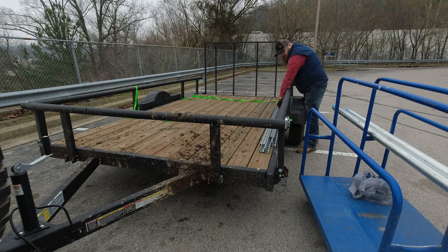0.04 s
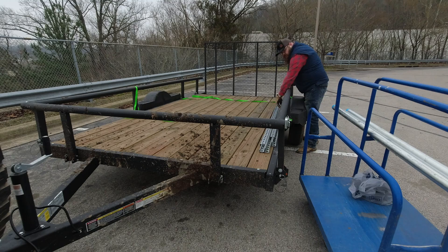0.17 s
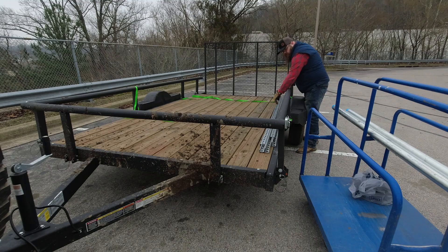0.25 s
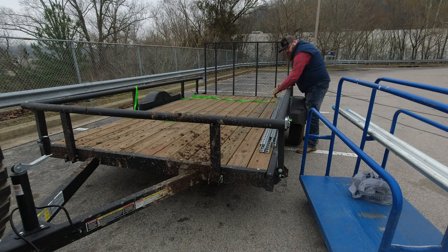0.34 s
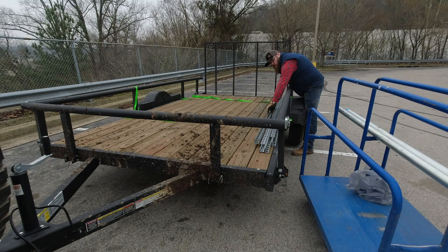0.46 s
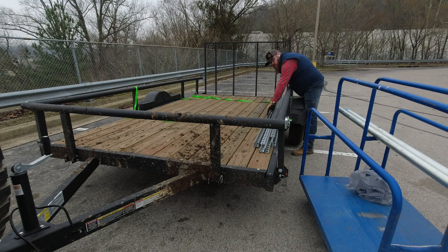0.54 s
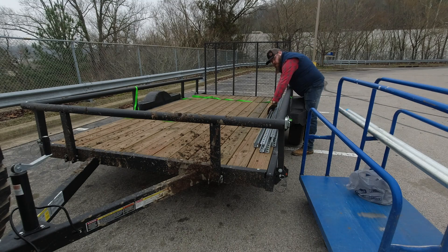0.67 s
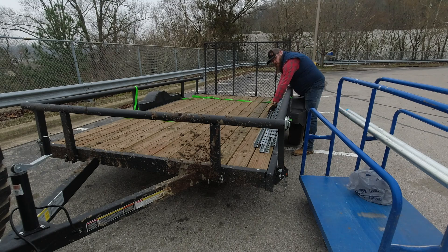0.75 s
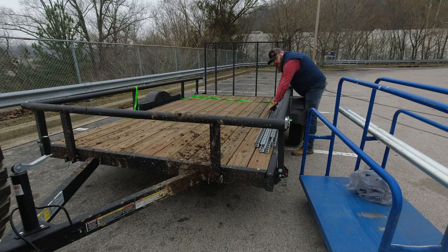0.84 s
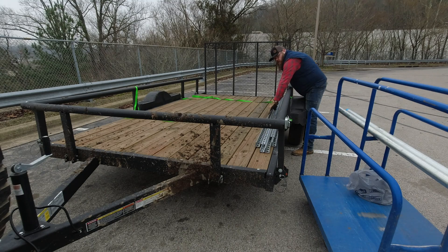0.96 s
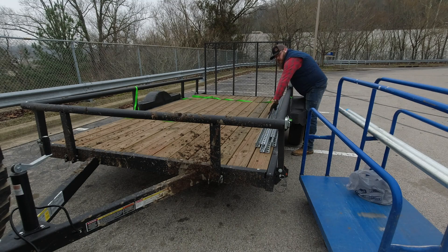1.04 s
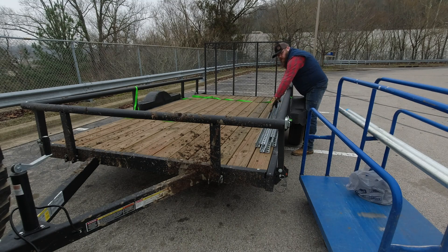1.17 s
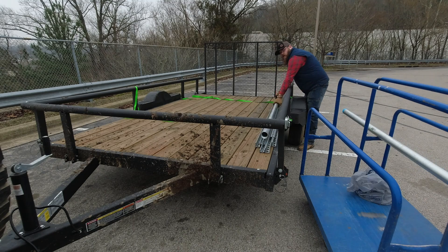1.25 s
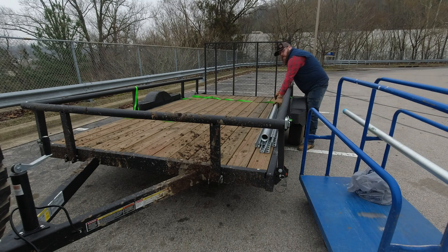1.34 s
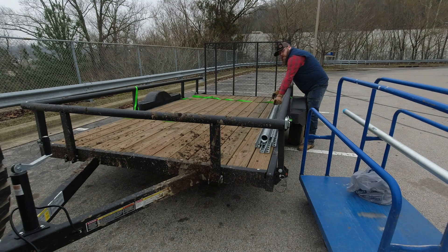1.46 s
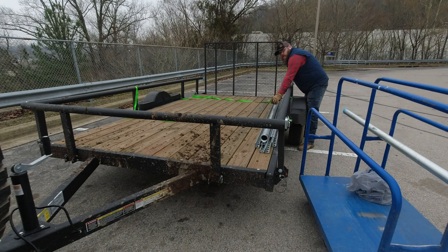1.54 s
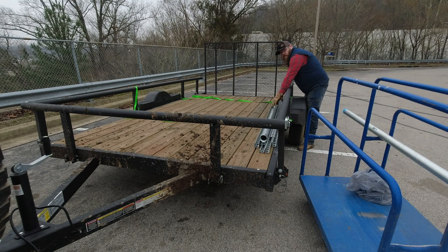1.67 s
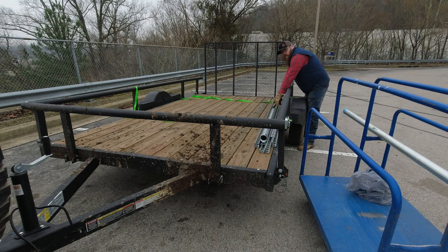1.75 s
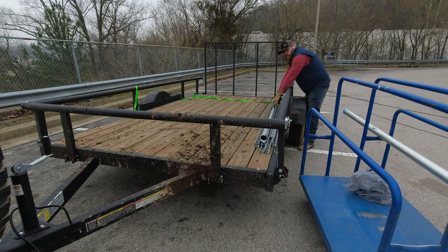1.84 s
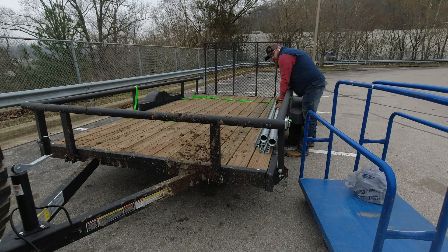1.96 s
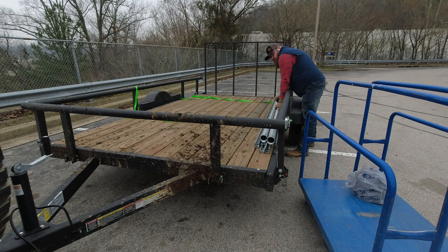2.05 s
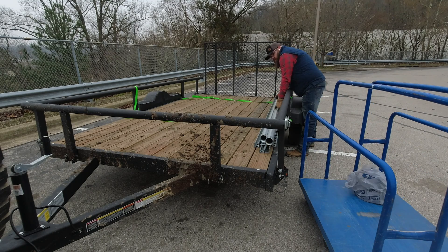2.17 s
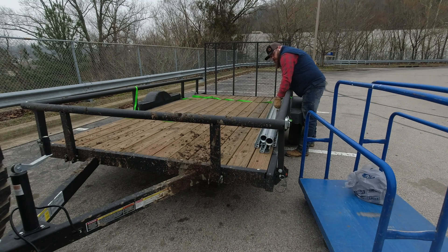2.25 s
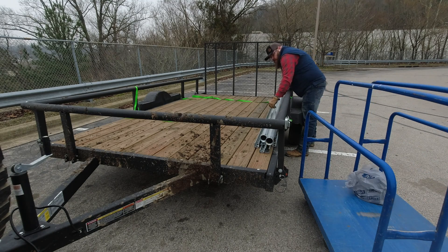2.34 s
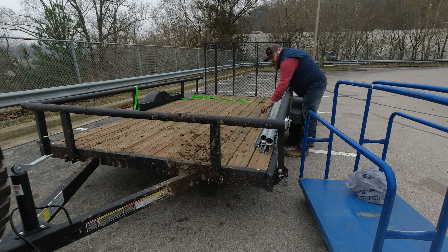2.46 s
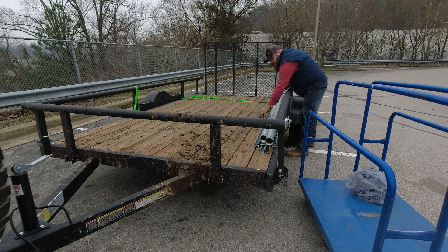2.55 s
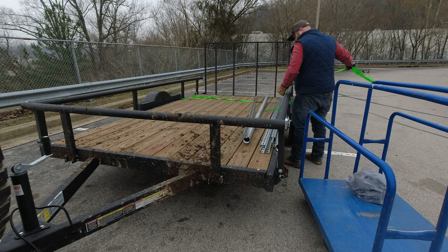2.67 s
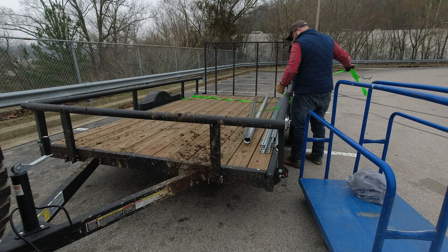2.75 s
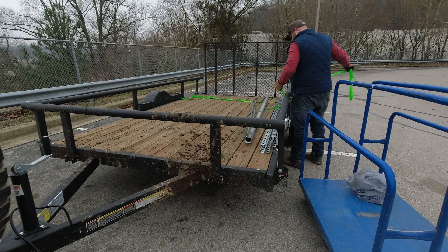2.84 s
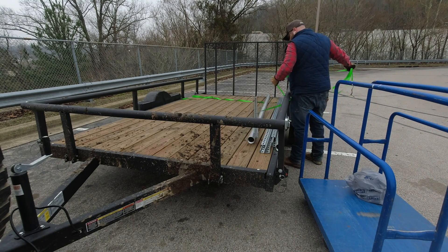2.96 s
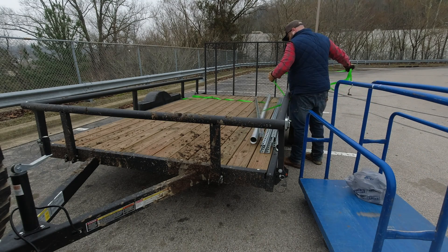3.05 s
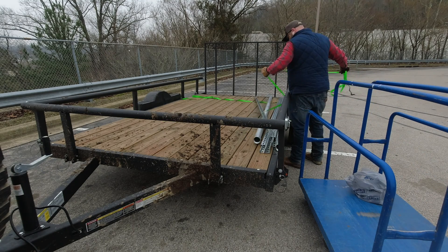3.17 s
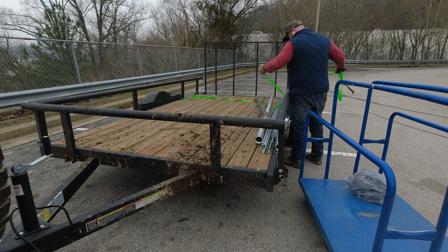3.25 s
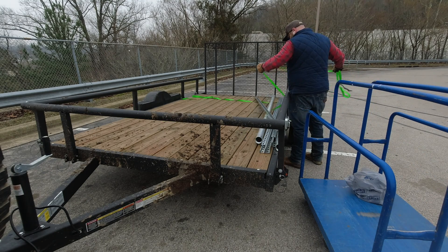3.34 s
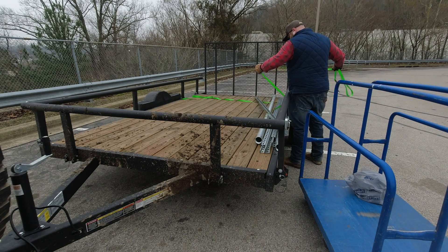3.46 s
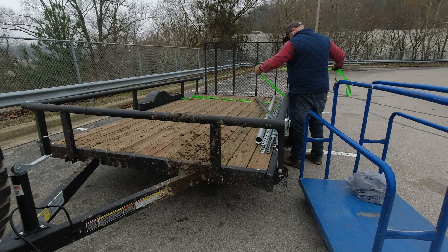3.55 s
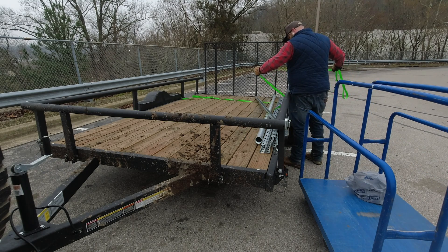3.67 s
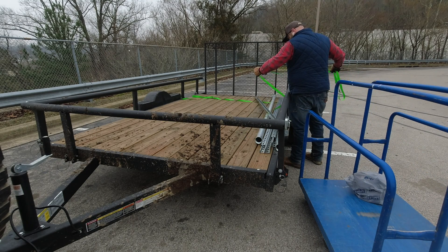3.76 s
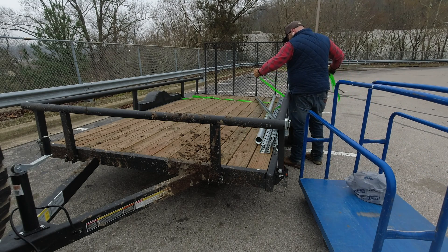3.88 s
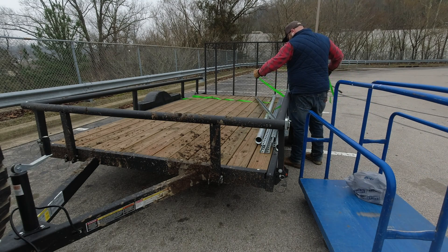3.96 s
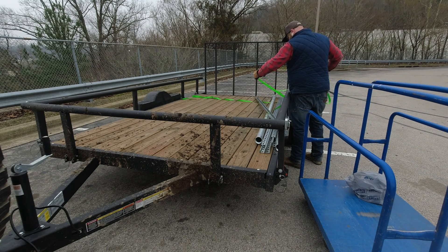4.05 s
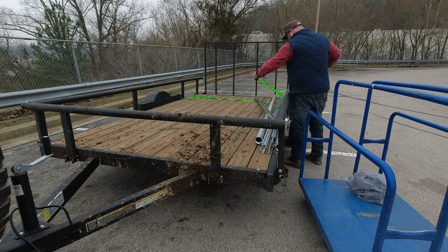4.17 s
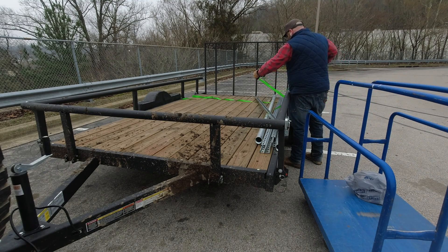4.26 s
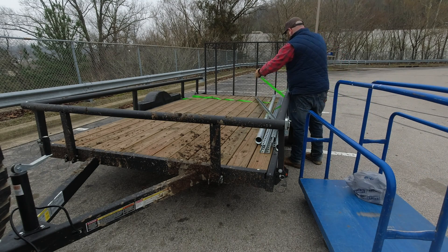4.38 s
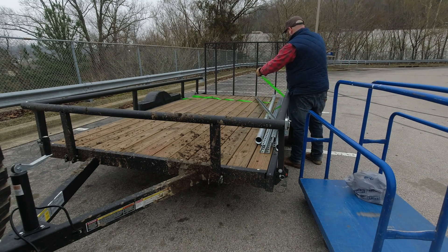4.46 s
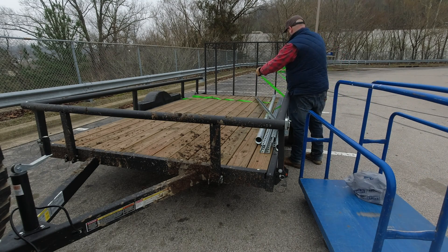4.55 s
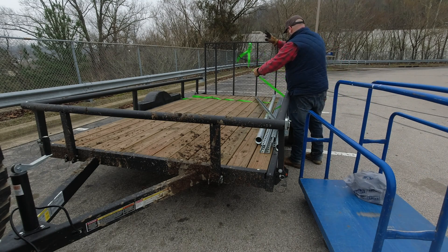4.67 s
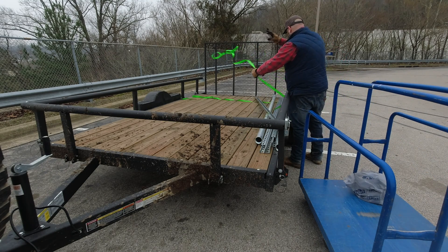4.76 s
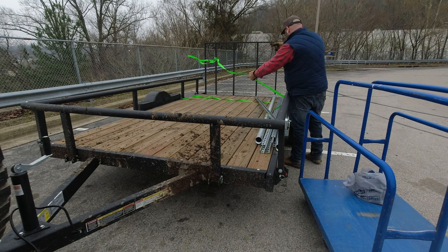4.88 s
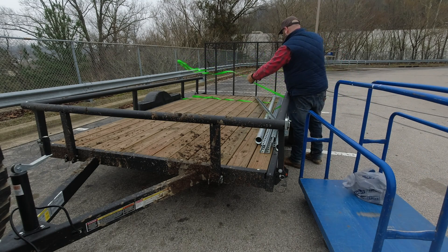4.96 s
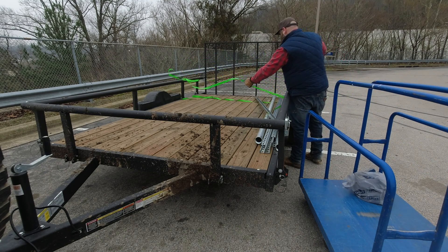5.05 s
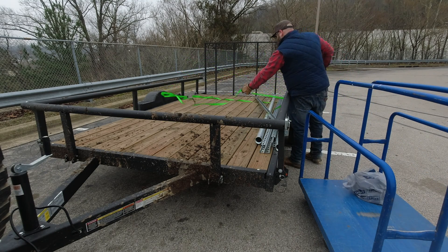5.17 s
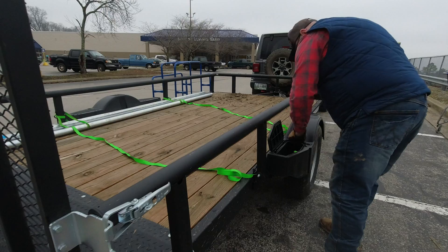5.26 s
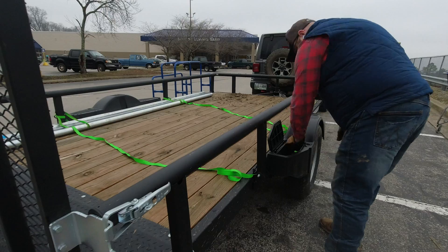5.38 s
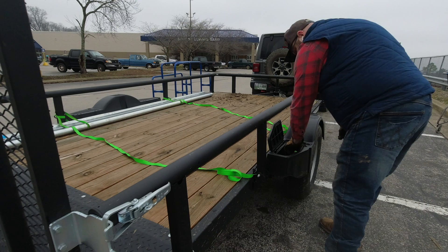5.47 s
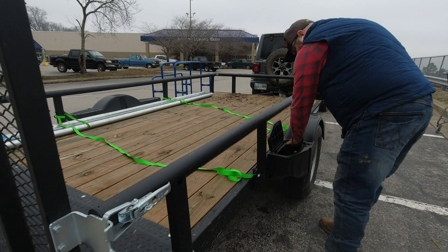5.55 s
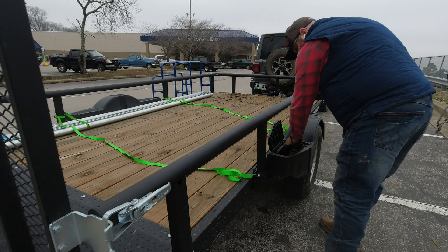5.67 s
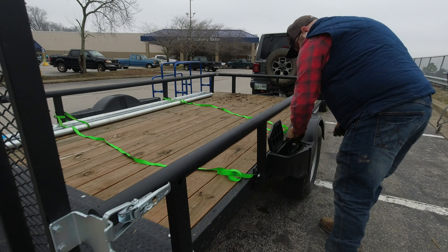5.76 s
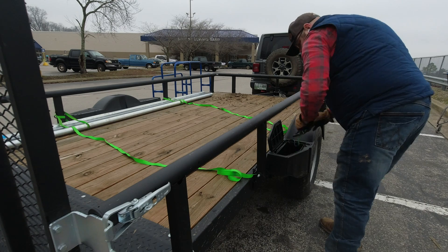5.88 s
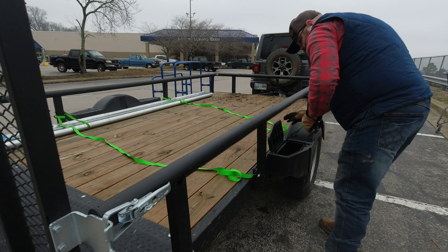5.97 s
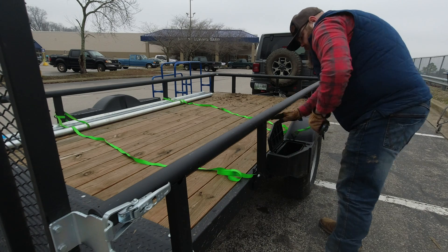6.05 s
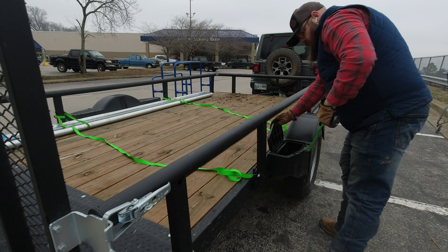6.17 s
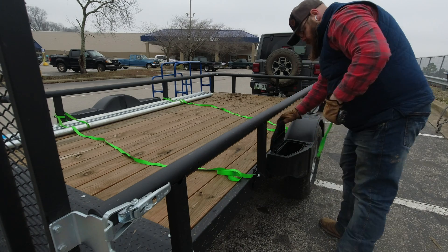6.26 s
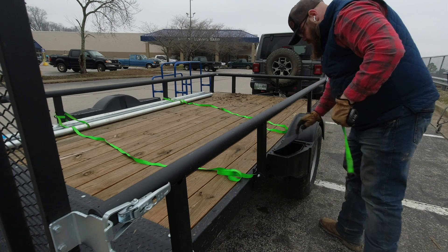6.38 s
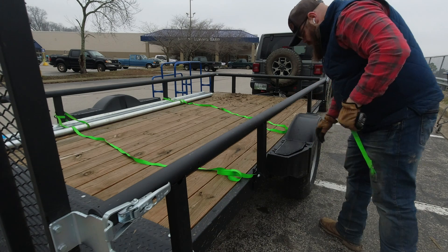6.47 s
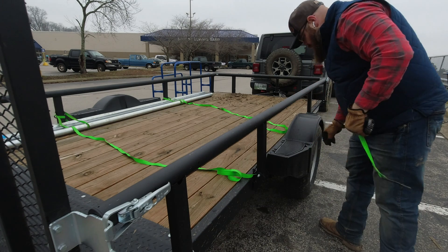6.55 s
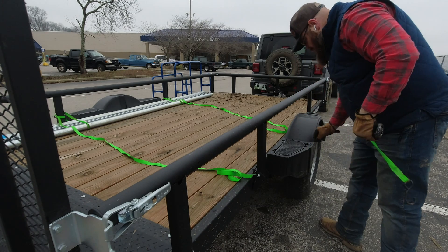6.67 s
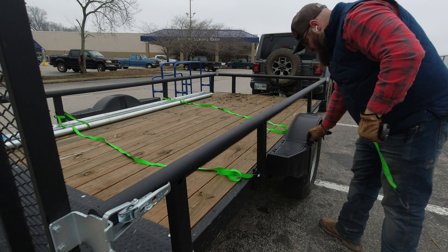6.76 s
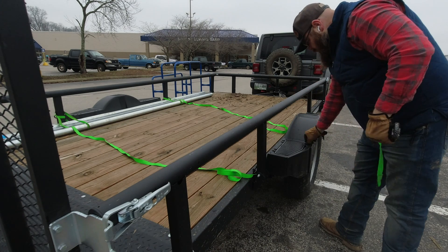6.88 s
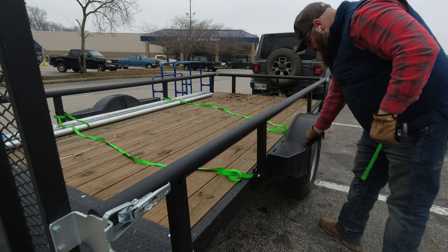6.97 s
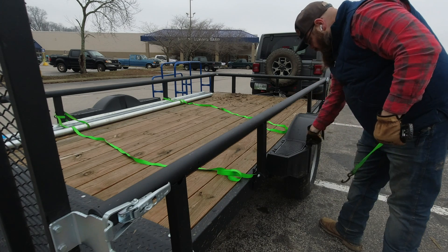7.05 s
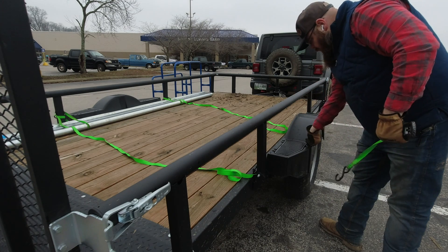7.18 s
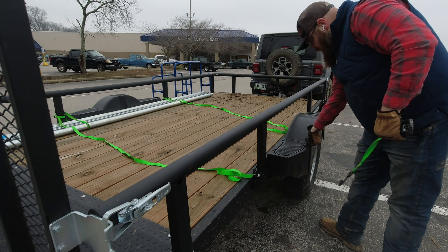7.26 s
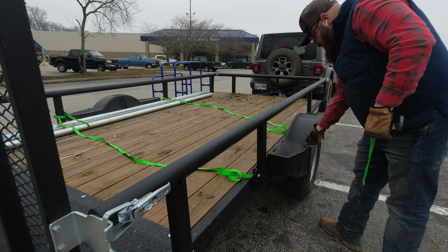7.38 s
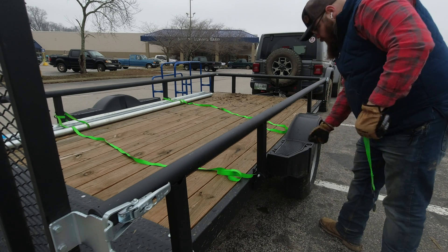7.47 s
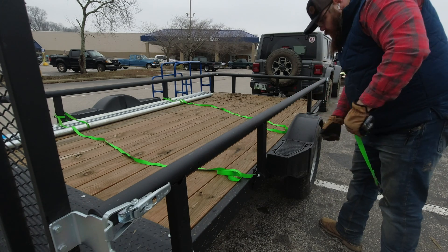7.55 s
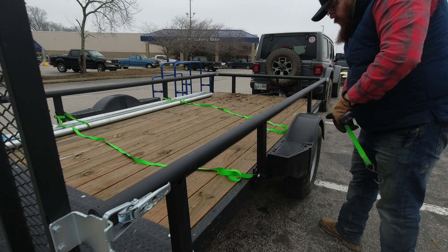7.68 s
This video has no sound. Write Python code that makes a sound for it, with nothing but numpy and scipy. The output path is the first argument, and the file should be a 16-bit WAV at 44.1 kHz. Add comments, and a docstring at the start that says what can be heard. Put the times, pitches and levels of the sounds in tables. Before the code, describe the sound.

Steel pipes crash and clatter loudly onto a trailer bed outdoors, then a strap rustles softly and a plastic tool box knocks and snaps shut.

```python
"""Steel pipes on a trailer

Steel pipes and channel are laid on a trailer bed in an open car park, with scrapes, blows and clatter.
A strap rustles, then a plastic tool box is searched and shut. Contacts are shaped noise that also drives
ringing sine tones. Time jumps forward several times, cutting rings short. Noise makes the far traffic and the
low rumble of wind and heavy thumps, sine tones the idling engine and bird whistles. Loud clashes overload."""
import sys
import numpy as np
from scipy import signal
from scipy.fft import rfft, irfft, next_fast_len
from scipy.io import wavfile

SR = 44100
rng = np.random.default_rng(int(sys.argv[2]) if len(sys.argv) > 2 else 0)


def log_audio(samples):
    """Write samples as a 16-bit WAV file to the path given in sys.argv[1]."""
    # one column per channel
    frames = np.atleast_2d(samples).T
    # limit to full scale, then quantise
    limited = np.clip(frames, -1, 1)
    pcm = np.round(limited * 32767).astype(np.int16)
    wavfile.write(sys.argv[1], SR, pcm)


N = 340452
T = np.arange(N) / SR   # time of each sample in seconds
STEP = 16   # samples per step of the slower level curves


# How hard steel meets steel, one curve for each scrape, blow or stretch of clatter.
# Each row: time in seconds, relative level in dB.
CLATTER = [
    [(0.004, -20), (0.02, -26.5)],
    [(0.024, -21), (0.032, -10), (0.072, 1.5), (0.146, -1), (0.26, -28.5), (0.41, -43.5)],
    [(0.596, -28), (0.61, -25.5), (0.63, -28.5), (0.638, -31.5)],
    [(0.646, -12), (0.652, -0.5), (0.662, -11)],
    [(0.662, -10.5), (0.68, -15), (0.704, -12.5), (0.768, -16.5), (0.788, -17.5), (0.975, -44)],
    [(0.986, -32), (1.002, -8.5), (1.018, -9), (1.11, -41.5), (1.2, -48.5)],
    [(1.416, -28.5), (1.42, -18.5), (1.434, -7), (1.478, -14), (1.492, -10), (1.578, -20.5)],
    [(1.587, -11), (1.595, 4.5), (1.687, -2.5), (1.95, -39)],
    [(2.034, -32.5), (2.046, -17), (2.12, -34)],
    [(2.132, -17.5), (2.148, -7.5), (2.286, -12), (2.418, -43), (2.55, -53)],
    [(3.154, -30.5), (3.166, -46.5), (3.18, -48.5), (3.232, -48.5), (3.238, -39)],
    [(3.247, -31.5), (3.255, -13), (3.277, -15.5), (3.372, -29)],
    [(3.379, -21.5), (3.387, -17), (3.457, -34.5), (3.535, -36.5)],
    [(3.54, -38), (3.546, -35), (3.7, -57.5)],
]
# Colour of each of these curves at first touch. Each row: thud, knock, clang and sizzle in dB against the
# main band, dulling in dB per second (each band takes its own share), left minus right in dB.
CLATTER_COLOUR = [(-12.5, -8.5, -17.5, -36.5, 33.5, 7.5), (-11, -5.5, -3.5, -4.5, 101.5, -1.5),
                  (-11, -6, -11, -22.5, 32, 0), (-16, 14, -32.5, -30.5, 40, -1),
                  (3, 4, -12.5, -20, 17, -1.5), (-11.5, -7.5, -3.5, -3.5, 207, -1),
                  (-6.5, 1.5, -1.5, -15, 103, -0.5), (-7, 0.5, -2, -4, 128.5, 0),
                  (-0.5, 2.5, -15, -20.5, 205, -2), (-3.5, 0.5, -7, -13, 71.5, -1),
                  (25, 17.5, 2, -25, 30, -1), (-4.5, 1, -8.5, -24, 42, -1.5), (1.5, 9, -6, -16, 179, -0.5),
                  (15, 11.5, -15, -17, 51, 0)]


def clatter():
    """Each scrape, blow or clatter follows its curve and grows duller as the pieces settle."""
    rise_s, t60_s = 0.0028, 0.063   # first touch; 60 dB fall once the curve ends
    t = T[::STEP]
    start, end = np.array([(rows[0][0], rows[-1][0]) for rows in CLATTER]).T[:, :, None]
    thud, knock, clang, sizzle, dulling, pan = np.array(CLATTER_COLOUR).T[:, :, None]
    curves_db = np.array([np.interp(t, *np.transpose(rows)) for rows in CLATTER])
    db = curves_db - 60 * np.maximum(t - end, 0) / t60_s
    age = np.maximum(t - start, 0)
    power = (1 - np.exp(-age / rise_s)) ** 2 * from_db(2 * db)
    colour = np.hstack([thud, knock, 0 * pan, clang, sizzle])
    dulled_db = dulling * np.minimum(age, end - start)
    return start, power, colour, dulled_db, pan


def strikes(size):
    """Random strikes, each of another colour, stand out of the blur; mean power 1 in every band."""
    per_s, t60_s, share, scatter_db = 110, .05, .3, 3
    r = from_db(-120 * STEP / (t60_s * SR))
    hit = rng.random(size) < per_s * STEP / SR
    tint = rng.standard_normal((len(COLOUR_HZ), size))
    strike_power = from_db(2 * scatter_db * tint[:, hit].T)
    out = []
    for hz in CENTRES:
        sizes = np.zeros(size)
        sizes[hit] = [at_colours(hz, colours) for colours in strike_power]
        run = signal.lfilter([1], [1, -r], sizes)
        out.append(1 + share * (run / run.mean() - 1))
    return out


# Single blows of steel at the start of or inside a clatter. Each row: start in seconds, relative level in dB,
# thud, knock, clang and sizzle in dB against the main band, left minus right in dB, 60 dB fall in seconds.
STEEL_BLOWS = [(1.494, -16, -6, 0, 4, -6, 0, 0.19), (2.1322, -9, -5, 2, -14, -22, -4, .08),
               (2.227, -7, 1, 13, -15, -18, -2, 0.052), (2.265, -13, -10, 16.5, -13, -20, 0, 0.092),
               (2.328, -20.5, 11, 8, 0, -20, 2, 0.074), (3.1555, -42, 16, 18, -8, -25, -2, .05),
               (3.166, -36, 23, 21, -8, -25, -2, 0.046)]
# Overall tilt of the steel noise. Each row: frequency in Hz, change in dB.
STEEL_EDGES = [(60, -20), (110, -7.5), (200, -1), (300, 0.5), (10000, -0.5), (12000, -5.5), (16300, -15)]


def steel(metal):
    """Clatter and single blows as contact noise, with the force they pass to the ringing pieces."""
    laid = [np.vstack(pair) for pair in zip(clatter(), blows(STEEL_BLOWS, KNOCK_RISE_S))]
    lumps = strikes(len(T[::STEP]))
    return contacts(laid, metal, STEEL_EDGES, tail_db=-10, grain_db=0.46, lumps=lumps)


# Clear ringing tones (modes) of each piece. Each row: frequency in Hz, relative level in dB,
# 60 dB fall in seconds (when played, never longer than 0.9).
BUNDLE = [(495, -10, 0.94), (1125, -8, 0.38), (1416, -2, 0.47), (1567, 0, 0.27), (1782, -6, 0.33),
          (2342, -8, 0.28), (2853, -11, 0.31), (3085, -6, 0.24), (3585, -12, 0.22), (3801, -3, 0.15),
          (4452, -9, 0.34), (5281, -19, 0.39), (6498, -18, 0.42), (9991, -13, 0.12), (10470, -20, 0.16),
          (10610, -17, 0.15), (10890, -29, 0.24), (11790, -28, 0.23)]
THIN_PIPE = [(463, 0, 0.27), (538, -2, 0.34), (1567, -12, 0.53), (1674, -1, 0.15), (2347, -13, 0.39),
             (2492, -15, 0.37), (2600, -15, 0.39), (2719, -12, 0.53), (3219, -17, 0.45), (3332, -11, 0.43),
             (3451, -15, 0.42), (4097, -19, 0.33), (4387, -21, 0.39), (4829, -20, 0.31), (5211, -15, 0.3),
             (6288, -24, 0.4), (7095, -27, 0.39), (7305, -25, 0.31)]
CHANNEL = [(603, -19, 0.36), (1427, 0, 0.097), (2627, -24, 0.3), (3225, -8, 0.1), (4221, -31, 0.39),
           (4355, -17, 0.17), (4683, -15, 0.12), (5394, -27, 0.27), (6503, -21, 0.16), (7397, -19, 0.1),
           (8096, -26, 0.45), (8419, -24, 0.17), (9119, -18, 0.21), (10160, -38, 0.26)]
THICK_PIPE = [(528, -4, 0.71), (1190, -11, 0.47), (1480, -3, 0.21), (1879, -4, 0.2), (2223, 0, 0.15),
              (2353, -8, 0.27), (2589, -18, 0.5), (2810, -16, 0.53), (3338, -13, 0.26), (4177, -14, 0.27),
              (4301, -11, 0.3), (5033, -10, 0.18), (5276, -13, 0.29), (5346, -21, 0.36), (5690, -14, 0.19),
              (7757, -30, 0.36), (8947, -19, 0.15), (9668, -25, 0.18)]
SECOND_PIPE = [(447, -11, 0.35), (538, 0, 0.18), (738, -16, 0.55), (969, -10, 0.25), (1480, -16, 0.47),
               (2584, -21, 0.25), (2799, -18, 0.58), (3101, -23, 0.35), (3467, -24, 0.35),
               (3784, -26, 0.34), (4199, -15, 0.13), (4457, -13, 0.14), (5163, -22, 0.17),
               (7908, -39, 0.48), (9421, -38, 0.33), (9868, -36, 0.21)]
RAIL = [(226, -7, 0.89), (334, -12, 5.0), (517, -4, 0.23), (1464, -16, 3.0), (1567, -11, 0.58),
        (1776, -10, 2.5), (1997, -18, 1.9), (2105, 0, 0.12), (2223, -25, 5.0), (2331, -7, 0.2),
        (2837, -13, 0.35), (3090, -20, 0.63), (3467, -27, 5.0), (3720, -33, 1.3), (4479, -20, 0.38),
        (4705, -14, 0.45), (5410, -25, 0.34), (9318, -52, 5.0)]
FREE_PIPE = [(2870, 0.0013, 1)]
LATCH = [(727, -2, 0.2), (1238, 0, 0.15), (1362, -11, 0.24), (2239, -9, 0.15), (2589, -11, 0.16),
         (3408, -5, 0.1), (3564, -4, 0.1), (4237, -17, 0.16), (4452, -14, 0.12), (5120, -19, 0.14)]
BOX = [(366, -8.5, 0.22), (563, -30, 0.18), (614, -7.5, 0.36), (657, -3.5, 0.17), (700, -10, 0.14),
       (955, -13, 0.48), (1013, -2.5, 0.13), (1080, -7, 0.11), (1270, -2, 0.081), (1360, -10, 0.15),
       (4312, -38, 0.17), (7510, -37, 0.16)]
# Which piece rings when. Each row: start in seconds, end in seconds, relative level in dB, modes.
PIECES = [(0, .415, -18.5, BUNDLE), (.64, 0.989, -7.5, THIN_PIPE), (.98, 1.237, -13.5, CHANNEL),
          (1.3, 1.954, -15, THICK_PIPE), (1.7, 2.464, -28.5, FREE_PIPE), (2.0, 2.655, -15, SECOND_PIPE),
          (3.1, 5.25, -8.5, RAIL), (5.6, 6.502, -7, BOX), (6.5, 7.706, -14, LATCH)]
# While pieces touch, further modes sound but die at once. Each row: frequency in Hz,
# width in Hz (under 18 counts as 18), level in dB against the others of its piece.
BUNDLE_HELD = [(746, 49, -2), (928, 44, -2.5), (1130, 25, -7.5), (1550, 26, 2), (2010, 39, 0),
               (2480, 24, -4.5), (2800, 18, -12.5), (2900, 39, -12.5), (3240, 26, -8.5), (3700, 25, -11),
               (3830, 23, -6.5), (4500, 110, 2), (4772, 11, -3), (5260, 61, -1), (5825, 56, -9.5),
               (8010, 53, -9)]
THIN_PIPE_HELD = [(458, 91, 3), (750, 59, 1), (1027, 100, -30.5), (1630, 39, -13), (2520, 21, -6.5),
                  (2820, 7.3, -4), (2930, 29, -22.5), (3074, 39, -22.5), (3330, 27, -15), (4360, 38, -14)]
CHANNEL_HELD = [(2750, 57, 3.5), (2780, 66, -4), (3200, 130, -19), (3700, 69, -15), (4050, 38, -2),
                (4500, 36, 2), (5200, 57, -6), (5150, 43, -3), (6980, 39, -17.5), (8760, 130, -1)]
THICK_PIPE_HELD = [(539.4, 280, 4.5), (1466, 16, -2.5), (1698, 62, 3.5), (2400, 140, 1), (2730, 27, -8),
                   (2840, 59, -2.5), (4410, 23, 4.5), (4840, 100, -6), (5550, 19, -2.5), (5560, 140, -12),
                   (5840, 96, -18), (6450, 36, -16), (7670, 77, -20.5), (7840, 71, -16.5),
                   (8350, 36, -12.5), (8597, 74, -10.5)]
SECOND_PIPE_HELD = [(327.4, 58, -6.5), (752, 210, 5), (1540, 17, 3), (1795, 40.8, 8), (1905, 15, -1.5),
                    (2025, 31, 5), (2180, 25.2, -11), (2790, 120, -2), (2970, 15, -6), (3000, 76, -19),
                    (3780, 39, -0.5), (5270, 270, 3), (6160, 57, -23), (6350, 46, -23), (6830, 54, -11),
                    (8150, 109, -3.5)]
RAIL_HELD = [(625, 61, 9), (1300, 32, -26), (1450, 27, -1), (1837, 55, 10.5), (2060, 25, -12),
             (2190, 17, -49), (2610, 33, 5), (3090, 180, 6), (3790, 122, 11.5), (3980, 150, -4),
             (4040, 50, -12), (4810, 92, -16), (4930, 55, -5), (5470, 27, 2), (5650, 27, -18),
             (7870, 86, -0.5)]
# Which held piece sounds when. Each row: start in seconds, end in seconds, relative level in dB, resonances.
HELD = [(0, 0.425, -11, BUNDLE_HELD), (0.639, .99, -6, THIN_PIPE_HELD), (0.98, 1.25, -11, CHANNEL_HELD),
        (1.301, 1.962, -12.5, THICK_PIPE_HELD), (1.997, 2.67, -8.5, SECOND_PIPE_HELD),
        (3.2, 3.9, -9.5, RAIL_HELD)]


def rings(force):
    """Contacts feed energy into the clear modes of the piece in hand and knock their phase about."""
    jolt, jolt_rise = .8, .3   # phase jolt at the main band; power law with pitch
    out, jolts = np.zeros((2, N)), rng.standard_normal(N)
    held = [(start, end, db, damped(peaks)) for start, end, db, peaks in HELD]
    for start, end, ring_db, modes in PIECES + held:
        span = slice(int(start * SR), int(end * SR))
        for k, (hz, db, t60) in enumerate(modes):
            # each mode is pushed by the nearest colour band, so dull contacts feed high modes less
            nearest = np.argmin(abs(np.log(hz / np.array(COLOUR_HZ))))
            push = force[nearest, span] + 1e-9
            r = from_db(-120 / (np.clip(t60, .014, .9) * SR))
            swing = np.sqrt(signal.lfilter([1 - r], [1, -r], push ** 2))
            # a small swing is easily thrown off
            jolt_size = jolt * (hz / COLOUR_HZ[2]) ** jolt_rise * np.sqrt(1 - r) * push / swing
            jolted = np.roll(jolts, 997 * k)[span] * jolt_size
            tone = swing * np.sin(2 * np.pi * hz * T[span] + np.cumsum(jolted))
            side_db = rng.normal(0, 0.77) * np.array([[1], [-1]])
            out[:, span] += tone * from_db(db + ring_db + side_db)
    return out


def damped(peaks):
    """Broad resonances become short-lived modes, the strongest at 0 dB: the wider, the shorter."""
    top = max(db for hz, width_hz, db in peaks)
    return [(hz, db - top, np.log(1000) / (np.pi * max(width_hz, 18))) for hz, width_hz, db in peaks]


# Hands, hooks and lid on the tool box and rail. Each row: start in seconds, relative level in dB,
# thud, knock, clang and sizzle in dB against the main band, left minus right in dB, 60 dB fall in seconds.
KNOCKS = [(2.7112, -50.5, 1, -2, 5, -7, -2, 0.15), (2.7994, -51, 8, -1, 2, 5, -2, 0.27),
          (2.8537, -40, 12, 17, -5, 9, 1, 0.038), (5.1492, -38.5, 0, 8, -26.5, -16, 3, 0.075),
          (5.622, -54, 8, 3, -16.5, -31, -5, 0.2), (5.7275, -29, -19, -1.5, -33, -36.5, -3, 0.074),
          (5.7879, -35, -10.5, 11.5, -26.5, -32, -1.5, 0.08), (5.813, -44.5, 5, 6, -29, -34, -5, 0.15),
          (5.8865, -40, -5.5, -8, -10, -16.5, -3.5, 0.048),
          (5.9861, -7, -23.5, 14, -22.5, -45.5, -2.5, 0.061), (6.021, -35, 2, 24, -38.5, -43, -4, .076),
          (6.057, -47.5, 20, 17, -28.5, -39, 3.5, 0.098), (6.316, -36, 1, 12, -33.5, -23, -2.5, 0.075),
          (6.3387, -57.5, 16.5, 11, -29, -43, -8, 0.11), (6.5365, -42, 14, -16, -4.5, -36, -4.5, 0.29),
          (6.5809, -10, -8.5, 4, -4, -14.5, -2, 0.1), (6.605, -24, 5, 9.5, -21, -34, -3, 0.36),
          (6.6508, -17.5, 7.5, -1, -4.5, -17, -2, 0.1), (6.6902, -29.5, -23, 12, -7, -27, -2, 0.09),
          (7.2844, -57, -1, 0, -11.5, -5, -5, 0.083)]
# Boots and gloves dragging, slower to start. Each row: the same columns as the knocks.
SCUFFS = [(.572, -32.5, 19, 13, -11.5, -33, -4.5, 0.22), (5.835, -51, 6, 1.5, -6, -17, 2, .23),
          (6.2, -59, -3, 15, -8, -20, 1, 0.48), (7.07, -55, 6.5, 14, -20, -27.5, -3.5, 0.42),
          (7.14, -51.5, 15.5, 16, -10, -25, -5, 0.22)]
# Overall tilt of the handling noise. Each row: frequency in Hz, change in dB.
BOX_EDGES = [(60, -51), (110, -27.5), (200, 5.5), (300, -1), (10000, 2.5), (12000, -12), (16300, -20)]
KNOCK_RISE_S, SCUFF_RISE_S = 0.0032, .02


def tool_box(metal):
    """Knocks and scuffs as grainy contact noise, with the force they pass to the ringing pieces."""
    handling = [np.vstack(pair) for pair in zip(blows(KNOCKS, KNOCK_RISE_S), blows(SCUFFS, SCUFF_RISE_S))]
    return contacts(handling, metal, BOX_EDGES, tail_db=-12.5, grain_db=2.6, lumps=np.ones(len(CENTRES)))


def blows(rows, rise_s):
    """Single blows with a quick rise and plain decay: start, power, colour, dulling (none) and pan."""
    start, db, thud, knock, clang, sizzle, pan, t60 = np.array(rows).T[:, :, None]
    age = np.maximum(T[::STEP] - start, 0)
    power = (1 - np.exp(-age / rise_s)) ** 2 * from_db(2 * db - 120 * age / t60)
    colour = np.hstack([thud, knock, 0 * db, clang, sizzle])
    return start, power, colour, 0 * age, pan


# Centres in Hz of the thud, knock, main, clang and sizzle bands.
COLOUR_HZ = [260, 700, 1800, 4600, 10000]
# How far each of these bands follows the dulling: above zero grows, below zero fades.
DULLING_SHARE = [0.35, 0.085, -0.01, -0.19, -0.74]
# How long the blurred ring lasts. Each row: frequency in Hz, 60 dB fall in seconds.
BLUR_TAIL = [(150, 0.22), (500, 0.25), (1500, 0.26), (4000, 0.14), (8000, 0.06), (14000, 0.18)]
# How alike left and right are in the contact noise. Each row: frequency in Hz, likeness (1 is the same).
BLUR_ALIKE = [(60, .75), (150, .88), (500, .94), (1200, .92), (2500, .96), (4500, .97), (8000, .82),
              (12000, .6)]
# Jumps in time. Each row: time in seconds, traffic level from then on in dB before its swell.
JUMPS = [(0, -50.5), (.415, -50.5), (1.247, -45.5), (1.959, -48), (2.664, -41.5), (5.251, -58.5)]


def contacts(events, bands, edges, tail_db, grain_db, lumps):
    """Each blow is a swarm of tiny contacts; countless close modes blur it into noise that dies band by band."""
    blur_db = 2.5   # the blurred modes against the clear ones
    t = T[::STEP]
    start, power, colour, dulled_db, pan = events
    jump_s = [row[0] for row in JUMPS]
    shot = np.searchsorted(jump_s, t)
    power = power * (shot == np.searchsorted(jump_s, start))   # no blow sounds past a jump
    uneven = from_db(2 * grain_db * drift(150)[::STEP])
    noise = 0
    for hz, band, lump in zip(CENTRES, bands, lumps):
        tint = np.array([at_colours(hz, c) + at_hz(edges, hz) for c in colour])
        settled = power * from_db(2 * at_colours(hz, DULLING_SHARE) * dulled_db)
        side_gain = from_db(2 * tint + pan.T * [[1], [-1]])
        direct = (side_gain @ settled) * uneven * lump
        r = from_db(-120 * STEP / (at_hz(BLUR_TAIL, hz) * SR))
        tail = np.hstack([signal.lfilter([1 - r], [1, -r], direct[:, shot == k]) for k in np.unique(shot)])
        level = np.sqrt(direct + from_db(2 * tail_db) * tail)
        noise = noise + [np.interp(T, t, side) for side in level] * stereo(band, hz, BLUR_ALIKE)
    force = []
    for share in DULLING_SHARE:
        # settling: low clear modes gain on the blur, high ones feel part of the dulling
        ring_share = share + .1 if share > 0 else share * 0.32
        ring_power = (power * from_db(2 * ring_share * dulled_db)).sum(axis=0)
        force.append(np.interp(T, t, np.sqrt(ring_power * uneven)))
    return from_db(blur_db) * noise, np.array(force)


# Strokes of the strap. Each row: time in seconds, relative level in dB.
STRAP = [
    [(2.66, -56), (2.732, -61.5), (2.85, -52), (3.272, -55), (3.372, -52), (3.434, -63.5), (3.64, -85.5),
     (3.75, -69.5)],
    [(4.3, -78), (4.81, -66), (4.956, -58), (5.098, -70.5), (5.253, -82.5)],
    [(5.26, -91.5), (5.52, -84), (6.18, -71), (6.57, -81.5), (6.71, -73.5), (7.31, -82), (7.72, -76.5)],
]
# Colour of the rustle. Each row: frequency in Hz, relative level in dB per Hz.
STRAP_COLOUR = [(880, -24), (1500, 0.5), (1950, -5), (2360, -8), (2550, -8.5), (4860, -12.5), (10700, -10),
                (15000, -25)]
# A pipe sliding along the load. Each row: time in seconds, level in dB against the rustle.
PIPE_SLIDE = [(2.8, -12), (2.95, 5.5), (3.1, 9), (3.25, 5.5), (3.4, -23)]
# Broad resonances of the sliding pipe. Each row: frequency in Hz, width in Hz, relative level in dB.
SLIDING_PIPE = [(1940, 120, 1), (3860, 750, 6.5), (4500, 530, -1), (5250, 600, 5)]


def strap(bands):
    """Webbing dragged over wood and cloth: bright, grainy rustle; meanwhile a pipe slides, its broad resonances
    rung by grainy noise."""
    level = sum(from_db(in_time(rows, -200)[0]) for rows in STRAP)
    grain = from_db(2.2 * drift(120))
    rustle = level * grain * steady(bands, STRAP_COLOUR, AIR_ALIKE, patchy_db=.4)
    sliding = from_db(in_time(PIPE_SLIDE, -200)[0]) * rustle
    woken = 0
    for hz, width_hz, db in SLIDING_PIPE:
        r = np.exp(-np.pi * width_hz / SR)
        resonator = [1, -2 * r * np.cos(2 * np.pi * hz / SR), r * r]
        woken += from_db(db) * signal.lfilter([1 - r, 0, r - 1], resonator, sliding)
    return rustle + woken


# Low rumble strength. Each row: time in seconds, level in dB before a slow random wobble.
RUMBLE = [(0.0, -47), (0.08, -27), (0.19, -56), (0.75, -45), (1.07, -61), (1.53, -51), (1.59, -22),
          (1.78, -44), (3.2, -48.5), (3.59, -29), (3.65, -38), (5.25, -48), (5.35, -36.5), (5.57, -55),
          (5.65, -43), (6.1, -67), (6.32, -48), (7.72, -42.5)]


def low_rumble():
    """Low rumble: wind on the microphone and the deep thump of the heaviest landings, mostly its own in each channel."""
    band = signal.butter(3, [14, 48], "band", fs=SR, output="sos")
    low = signal.sosfilt(band, rng.standard_normal((3, N)))
    level = from_db(in_time(RUMBLE)[0] + 1.0 * drift(3.4))
    return level * rms_one(0.1 * low[0] + low[1:])


# Bird whistles. Each row: start in seconds, end in seconds, first pitch in Hz, last pitch in Hz, peak level in dB.
BIRDS = [(4.189, 4.247, 4840, 4750, -66.5), (4.306, 4.47, 3500, 3470, -65),
         (4.56, 4.662, 4480, 4500, -64.5), (5.16, 5.22, 3840, 3787, -66), (7.619, 7.708, 3780, 3680, -76)]


def birds():
    """Thin far whistles: gliding sine tones that swell and fade."""
    out = np.zeros(N)
    for start, end, hz, end_hz, db in BIRDS:
        share = np.clip((T - start) / (end - start), 0, 1)
        swell = np.sqrt(np.sin(np.pi * share) + 1e-12)
        phase = 2 * np.pi * np.cumsum(hz + (end_hz - hz) * share) / SR
        out += from_db(db) * swell * np.sin(phase)
    return out


# Engine note. Each row: time in seconds, pitch in Hz before a random waver, relative level in dB.
ENGINE = [(2.67, 134, -43), (2.78, 140.1, -44), (3.15, 136, -48), (3.28, 139.8, -46), (3.34, 134.2, -39.5),
          (3.46, 131.5, -52.5), (3.64, 136.7, -45.5), (4.59, 141.1, -50.5), (4.82, 143.2, -45.5),
          (5.19, 138.5, -47.5), (5.25, 139.7, -51.5)]


def engine():
    """Idling engine: one low sine tone, wavering in pitch and level, heard between the last two jumps."""
    hz, db = in_time(ENGINE)
    level = from_db(db + 4.5 + 1.6 * drift(9))
    tone = level * np.sin(2 * np.pi * np.cumsum(hz + 2.0 * drift(12.5)) / SR)
    return tone * ((T > JUMPS[-2][0]) & (T < JUMPS[-1][0]))


# Colour of the traffic before the last jump. Each row: frequency in Hz, relative level in dB per Hz.
TRAFFIC = [(24, -33), (40, -2.5), (74, 1), (108, -1), (135, -2.5), (164, -3.5), (221, -6), (373, -12.5),
           (980, -10.5), (2850, -30.5), (4790, -39.5), (6620, -46.5), (15000, -53.5)]
# Colour of the traffic from the last jump on. Each row: the same columns.
QUIET_TRAFFIC = [(38, -31), (65, -9.5), (96, -10.5), (162, -15.5), (190, -18), (420, -27.5), (777, -18.5),
                 (1610, -25.5), (2370, -39.5), (3830, -42), (6030, -75), (15000, -78)]
# Rise and fall of the traffic. Each row: time in seconds, dB added to the level set at the jumps.
TRAFFIC_SWELL = [(0, 14.5), (2.6, 2.5), (3.7, 2), (4.5, 1.5), (5.25, 0.5), (6.2, 0), (7.0, 0), (7.72, -2)]
# How alike left and right are in traffic and strap. Each row: frequency in Hz, likeness (1 is the same).
AIR_ALIKE = [(60, 0.57), (180, 0.79), (550, 0.73), (1650, 0.21), (4970, 0.96), (15000, 0.78)]


def traffic(bands):
    """Far traffic as coloured noise, quieter and darker behind the trailer."""
    jump_s, jump_db = np.transpose(JUMPS)
    latest = np.maximum(np.searchsorted(jump_s, T) - 1, 0)
    level_db = jump_db[latest] + in_time(TRAFFIC_SWELL)[0]
    near = steady(bands, TRAFFIC, AIR_ALIKE, patchy_db=.6)
    far = steady(bands, QUIET_TRAFFIC, AIR_ALIKE, patchy_db=.4)
    return from_db(level_db) * np.where(T < jump_s[-1], near, far)


# Side on which traffic and engine are heard. Each row: time in seconds, left minus right in dB.
TRAFFIC_PAN = [(0, 0.5), (2.6, 2), (5.25, 2), (5.26, -5.5), (7.72, -4)]


def background(bands):
    """Traffic and engine share one shifting left-right balance."""
    pan_db = in_time(TRAFFIC_PAN)[0] / 2 * [[1], [-1]]
    return (traffic(bands) + engine()) * from_db(pan_db)


def from_db(db):
    """Gain of a level in dB."""
    return 10 ** (np.asarray(db) / 20)


def rms_one(x):
    """Scaled to rms (average strength) 1."""
    return x / np.sqrt(np.mean(x ** 2) + 1e-20)


def in_time(rows, outside=None):
    """Columns of a curve, sample by sample."""
    s, *columns = np.transpose(rows)
    return [np.interp(T, s, c, outside, outside) for c in columns]


def at_hz(points, hz):
    """A curve over frequency, read on a log-frequency axis."""
    points_hz, values = np.transpose(points)
    return np.interp(np.log(hz), np.log(points_hz), values)


def at_colours(hz, values):
    """Five values, one per colour band, read at any frequency."""
    return np.interp(np.log(hz), np.log(COLOUR_HZ), values)


def drift(rate):
    """Random wander of spread 1: noise smoothed above the rate in Hz, one draw per 40 samples."""
    r = np.exp(-80 * np.pi * rate / SR)
    draws = rng.standard_normal(N // 40 + 2002)
    slow = signal.lfilter([1], [1, -2 * r, r * r], draws)[2000:]   # skip the start-up
    return np.interp(np.arange(N) / 40, np.arange(len(slow)), rms_one(slow))


CENTRES = 45 * 2 ** np.arange(0, 8.6, .5)   # middles of the noise bands in Hz


def noise_bands(ripple_db=0):
    """Half-octave noise bands, two unrelated draws each, level equal per Hz; ripple adds countless faint modes."""
    size = next_fast_len(N)
    hz_axis = np.arange(size // 2 + 1) * SR / size
    ripple = np.interp(hz_axis, np.arange(1500) * 16, rng.standard_normal(1500))   # a new draw every 16 Hz
    gain = rms_one(from_db(ripple_db * ripple))
    white = irfft(rfft(rng.standard_normal((2, 2, size))) * gain, size)[..., :N]
    bands = []
    for k, hz in enumerate(CENTRES):
        band_filter = signal.butter(2, [hz / 2 ** .25, hz * 2 ** .25], "band", fs=SR, output="sos")
        bands.append(signal.sosfilt(band_filter, white[k % 2]))   # neighbours use different noise
    return bands


def stereo(band, hz, likeness):
    """A shared and an opposed part, mixed to the wanted left-right likeness."""
    alike = np.clip(at_hz(likeness, hz), 0, .995)
    return np.sqrt(1 + alike) * band[0] + np.sqrt(1 - alike) * band[1] * [[1], [-1]]


def steady(bands, spectrum, likeness, patchy_db):
    """Coloured noise whose bands flicker a little, together and apart; rms 1."""
    together = drift(1.7)
    out = 0
    for hz, band in zip(CENTRES, bands):
        flicker_db = patchy_db * (0.56 * together + drift(8.7))
        out = out + from_db(at_hz(spectrum, hz) + flicker_db) * stereo(band, hz, likeness)
    return rms_one(out)


def scene():
    """Steel, box, strap and the open air."""
    metal, air = noise_bands(ripple_db=2.8), noise_bands()
    steel_noise, steel_force = steel(metal)
    box_noise, box_force = tool_box(metal)
    small = box_noise + rings(steel_force + box_force)
    no_bass = signal.butter(3, 149, "high", fs=SR, output="sos")   # small bodies radiate no deep bass
    small = signal.sosfilt(no_bass, small)
    return steel_noise + small + strap(air) + low_rumble() + birds() + background(air)


def record(dry):
    """Hard overload flattens the peaks, then the top is cut."""
    overload, cutoff_hz = 1.04, 15600
    flat = np.clip(dry, -overload, overload)
    return signal.sosfilt(signal.cheby2(20, 60, cutoff_hz, fs=SR, output="sos"), flat)


dry = scene()
out = record(dry)
log_audio(out)
```